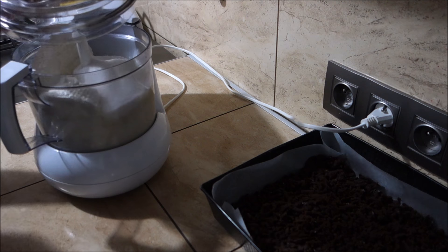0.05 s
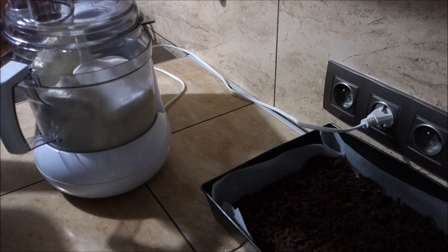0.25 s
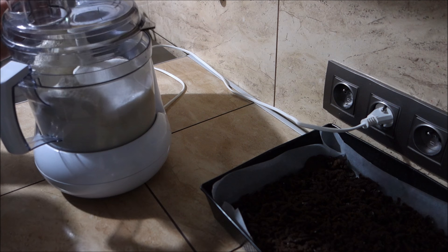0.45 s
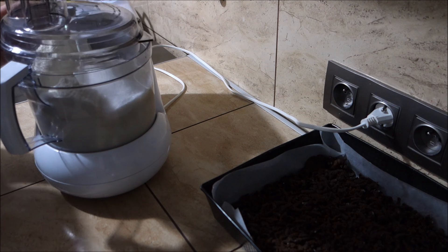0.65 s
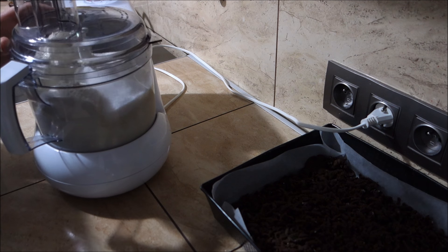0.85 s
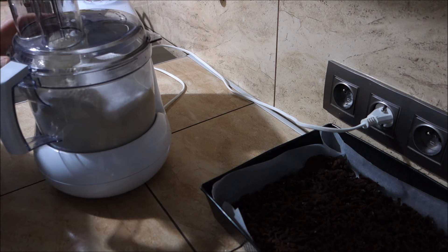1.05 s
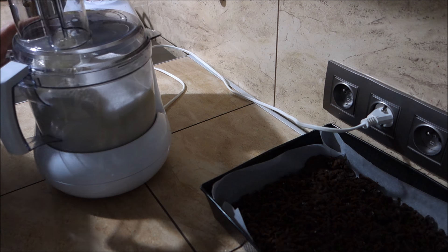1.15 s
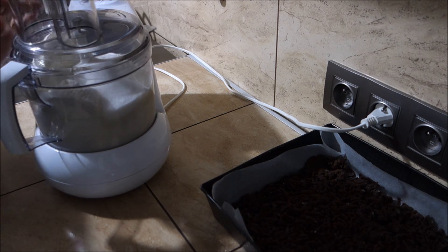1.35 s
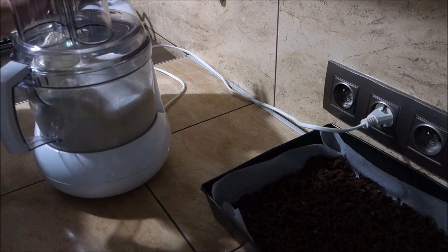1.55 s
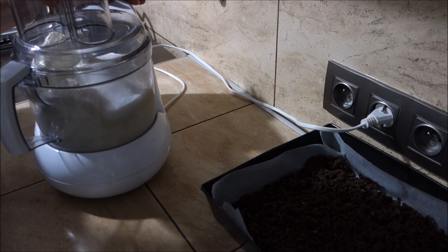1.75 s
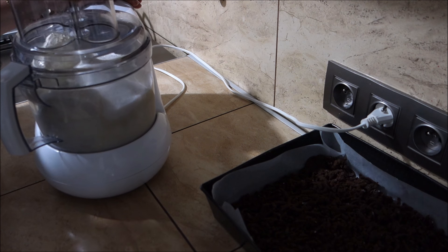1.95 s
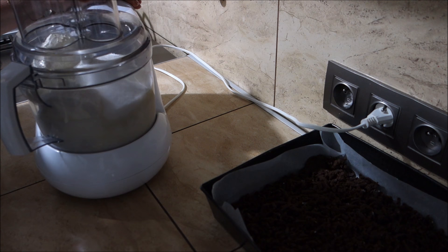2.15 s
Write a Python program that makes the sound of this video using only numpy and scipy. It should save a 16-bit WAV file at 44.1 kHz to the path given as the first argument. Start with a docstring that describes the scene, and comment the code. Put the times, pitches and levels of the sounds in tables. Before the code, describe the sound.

A plastic lid knocks and rattles onto a food processor bowl, slides briefly along the rim, then locks with a loud clatter. The hollow knocks ring a little in a tiled kitchen, heard close over a faint hum.

```python
"""Food processor lid on its bowl

A plastic lid is lowered onto the bowl, knocked about, slid and locked. Each knock is a short rattle
of hard contacts that rings the plastic; the hollow bowl booms and the counter thumps under it.
The tiled kitchen rings for half a second over a faint appliance hum; a small microphone limits peaks."""
import sys
import numpy as np
from scipy import signal
from scipy.fft import rfft, irfft
from scipy.io import wavfile
from scipy.ndimage import uniform_filter1d

SR = 44100
rng = np.random.default_rng(int(sys.argv[2]) if len(sys.argv) > 2 else 0)


def store_wav(level_fs):
    """Save 16-bit WAV to argv[1]."""
    pcm = np.round(np.clip(np.atleast_2d(level_fs), -1, 1) * 32767)
    wavfile.write(sys.argv[1], SR, pcm.T.astype(np.int16))


N = 97108

# air noise spectrum: f/Hz, relative density/dB
AIR_SPECTRUM = [(25, 15.5), (50, 0.5), (100, -53), (160, -15.5), (295, -12), (800, -14.5), (2100, -23.5),
                (5000, -30), (11000, -40.5)]
# appliance hum: f/Hz, level/dB
HUM_PARTIALS = [(49, -49), (97, -63), (295, -59)]
# left-right likeness of the room: f/Hz, correlation
STEREO_CORRELATION = [(60, 0.62), (170, 1), (500, 0.96), (1420, 0.64), (4080, 0.35), (11700, -0.56)]
# room decay: f/Hz, T60/s
ROOM_DECAY = [(60, 0.11), (200, 0.89), (600, 0.52), (2000, 0.56), (5000, 0.53), (11000, 0.38)]
# echo spectrum: f/Hz, relative level/dB
ROOM_SPECTRUM = [(60, -2), (200, -9), (600, 1.5), (2000, 2), (5000, 6.5), (11000, 9.5)]
# lid sliding on the rim: t/s, level/dB
SLIDE_ENVELOPE = [(1.1, -59), (1.2, -34.5), (1.333, -43.5), (1.371, -25.5), (1.428, -27.5), (1.5, -41),
                  (1.561, -60), (1.638, -52), (1.662, -32), (1.72, -66), (1.8, -72)]
# slide spectrum: f/Hz, relative density/dB
SLIDE_SPECTRUM = [(88, -54), (150, -15.5), (227, 0.5), (433, -16), (921, -15.5), (1800, -22), (6650, -31.5),
                  (12000, -40.5)]
# counter thumps: t/s, level/dB
COUNTER_THUMPS = [(.246, -31.5), (0.518, -33), (0.787, -33)]
# bowl booms: t/s, level/dB of the low, middle and upper hollow mode
BOWL_BOOMS = [(0.245, -17, -19.5, -14.5), (0.393, -69, -55, -36.5), (.516, -16, -5.5, -24),
              (0.56, -57, -23, -22), (0.661, -13, -12, -15.5), (0.788, -14.5, -9, -14.5),
              (0.814, -18.5, -3, -21), (0.881, -20, -8.5, -15), (0.93, -14.5, -5.5, -26),
              (0.966, -17, -49, -15), (1.003, -8.5, -17.5, -25), (1.039, -17.5, -17, -34),
              (1.15, -29, -23, -31), (1.236, -27.5, -20, -28), (1.293, -25.5, -41, -44),
              (1.374, -22, -36, -37.5), (1.646, -16, -31, -48), (1.701, -40, -21, -33),
              (1.81, -8, -18.5, -19), (1.854, -47, -19.5, -34), (1.924, -23, -17, -53),
              (1.949, -16.5, -18, -31), (2.003, -12.5, -5.5, -10.5), (2.045, -17, -19, -13),
              (2.101, -16, -22, -31)]
# modes of lid and bowl wall: f/Hz, relative level/dB, T60/s
PLASTIC_MODES = [(499, -2.5, 0.035), (574, -2.5, 0.06), (698.8, -6.5, 0.052), (870, -6, 0.04),
                 (969, -12.5, 0.06), (1241, -21.5, 0.054), (1568, -16, 0.038), (1685, -7.5, 0.024),
                 (2015, -4, 0.013), (2360, 1.5, .02), (2590, 8.5, 0.01), (2975, 11, 0.012),
                 (3390, 13, 0.01), (3834, 4, 0.013), (4560, -19, 0.057), (6890, 13.5, 0.0027)]
# knock bands: lower f/Hz, upper f/Hz
KNOCK_BANDS = [(400, 1500), (1500, 5000), (5000, 16000)]
# ring over crack for a squarely struck mode: level/dB per knock band
RING_OVER_CRACK = [14, 10, 8]
# rim on rim: t/s, level/dB per knock band (3), best-struck f/Hz (3), rattle decay/s
RIM_KNOCKS = [(0.241, -21, -26.5, -44.5, 1070, 1640, 2530, 0.023),
              (.514, -22.5, -28.5, -46, 480, 990, 2190, 0.0046),
              (0.531, -29.5, -27.5, -34.5, 7100, 1640, 3900, 0.003),
              (.661, -25.5, -31, -42, 480, 990, 2120, 0.0047),
              (0.7448, -39, -28, -27, 6660, 2060, 4500, 0.0036),
              (0.753, -28.5, -18, -48, 3000, 3470, 3700, 0.013),
              (.784, -16, -26.5, -33.5, 669, 965, 3880, 0.027),
              (.81, -21.5, -40, -63, 1016, 2060, 3450, 0.04),
              (.886, -23.5, -29, -61, 494, 990, 2040, 0.0065),
              (0.927, -20, -36, -71, 1260, 1620, 2000, 0.0017),
              (.989, -35, -27, -39, 1260, 2900, 4600, 0.0042),
              (0.996, -19, -23, -60, 953, 1260, 1950, 0.034),
              (1.03, -17, -30.5, -82, 882, 950, 2100, 0.027),
              (1.236, -31, -70.5, -51, 520, 905, 1650, 0.011),
              (1.428, -43, -36.5, -35.5, 900, 3000, 6700, 0.0015),
              (1.549, -45, -47, -79, 650, 2380, 3470, 0.0065),
              (1.646, -36.5, -43, -73, 860, 2430, 3470, 0.022),
              (1.678, -38, -40, -80, 910, 2350, 3320, 0.0023),
              (1.699, -36, -39, -79, 910, 1720, 2260, 0.0027),
              (1.807, -28, -35, -47.5, 780, 1080, 1630, 0.049),
              (1.849, -28, -27, -28.5, 970, 1770, 2880, 0.0025),
              (1.99, -22.5, -23, -31, 1050, 2020, 3090, 0.023),
              (2.006, -15.5, -20.5, -35.5, 1060, 1610, 2080, 0.031),
              (2.044, -22.5, -28, -40.5, 1030, 1670, 2020, 0.066),
              (2.1, -28, -29, -50, 970, 1210, 1720, 0.0021)]

AIR_DB, ROOM_DB, ROOM_BUILD_S = -47, 1.5, 0.00043
SLIPS_PER_S, CONTACTS_PER_S, CONTACT_SPREAD_DB = 2500, 5900, 1
THUMP_HZ, THUMP_SWING_S = 108, 0.04
HOLLOW_HZ, HOLLOW_SWING_S = (196, 272, 343), 0.022
SWING_RISE_S, SWING_DETUNE = 0.0064, 0.01
HELD_DB, HELD_T60_S, HELD_PHASE_STEP_RAD = -12, 0.5, 0.07
RATTLE_RISE_S, FIRST_BLOW_RATIO = 0.0014, 0.2
MODE_SPREAD_DB, OFF_SPOT_DB_PER_OCT = 2.5, 55
PORTS_BAND_HZ, PORTS_DB = (5870, 10000), -3.5
LIMIT_DB, ATTACK_S, RELEASE_DB_PER_S = -4, 0.0007, 261
BASS_CUT_HZ, STOPBAND_HZ = 110, 12000


def amp(db):
    return 10 ** (np.asarray(db) / 20)


def unit_rms(x):
    return x / np.sqrt(np.mean(x ** 2) + 1e-20)


def at_hz(points, hz):
    freqs_hz, values = np.transpose(points)
    return np.interp(np.log(hz), np.log(freqs_hz), values)


def bandpass(x, low_hz, high_hz):
    sos = signal.butter(2, [low_hz, high_hz], "band", fs=SR, output="sos")
    return signal.sosfilt(sos, x + 1e-18)


def resonator(x, hz, t60_s):
    """One mode: a click rings as a decaying cosine."""
    r, w = amp(-60 / (max(t60_s, 0.003) * SR)), 2 * np.pi * hz / SR
    return signal.lfilter([0.5, 0, -0.5], [1, -2 * r * np.cos(w), r * r], x + 1e-18) / np.sin(w)


def stereo_noise(gain_at, size):
    """Diffuse noise in half-octave bands, each with its own correlation and gain_at(hz)."""
    out, edges_hz = 0, 22 * 2 ** np.arange(0, 9.6, 0.5)
    white = rng.standard_normal((2, 2, size))
    for k, (low_hz, high_hz) in enumerate(zip(edges_hz, edges_hz[1:])):
        mid, side = bandpass(white[k % 2], low_hz, high_hz)
        hz = np.sqrt(low_hz * high_hz)
        corr = np.clip(at_hz(STEREO_CORRELATION, hz), -0.9, 0.99)
        out += gain_at(hz) * (np.sqrt(1 + corr) * mid + np.sqrt(1 - corr) * side * [[1], [-1]])
    return out


def contacts(rate_per_s, size):
    """Tiny hard touches, random in time and size."""
    sizes = amp(CONTACT_SPREAD_DB * np.minimum(rng.exponential(1, size), 4))
    signs = rng.choice([-1, 1], size)
    return unit_rms(sizes * signs * (rng.random(size) < rate_per_s / SR))


def room_tone():
    """Soft air noise plus appliance hum."""
    t = np.arange(N) / SR
    hum = sum(np.sqrt(2) * amp(db) * np.sin(2 * np.pi * (hz * t + rng.random()))
              for hz, db in HUM_PARTIALS)
    air = stereo_noise(lambda hz: amp(at_hz(AIR_SPECTRUM, hz)), N)
    return amp(AIR_DB) * unit_rms(air) + hum


def kitchen_echoes(x):
    """Dense reflections off the tiles: fast build-up, decay band by band."""
    t = np.arange(SR) / SR
    tail = stereo_noise(lambda hz: amp(at_hz(ROOM_SPECTRUM, hz) - 60 * t / at_hz(ROOM_DECAY, hz)), SR)
    tail *= 1 - np.exp(-t / ROOM_BUILD_S)
    return amp(ROOM_DB) * signal.fftconvolve(x[None], unit_rms(tail) / np.sqrt(SR), axes=1)[:, :N]


def lid_slide():
    """Dense slips of plastic on plastic, coloured by the lid."""
    colour = amp(at_hz(SLIDE_SPECTRUM, np.linspace(1, SR / 2, N // 2 + 1)))
    slips = irfft(rfft(contacts(SLIPS_PER_S, N)) * colour, N)
    level_db = np.interp(np.arange(N) / SR, *np.transpose(SLIDE_ENVELOPE))
    return amp(level_db) * unit_rms(slips)


def low_swing(start_s, hz, swing_s):
    """A low mode swells for a few cycles and dies; the room holds it at a wavering pitch."""
    out, t = np.zeros(N + SR), np.arange(SR // 2) / SR
    phase = 2 * np.pi * hz * (1 + SWING_DETUNE * rng.normal()) * t
    direct = np.exp(-(t / swing_s) ** 2) * np.sin(phase)
    wander = np.cumsum(rng.normal(0, HELD_PHASE_STEP_RAD, len(t)))
    held = amp(HELD_DB - 60 * t / HELD_T60_S) * np.sin(phase + wander)
    rise = (1 - np.exp(-t / SWING_RISE_S)) ** 2
    out[int(start_s * SR):][:len(t)] = rise * (direct + held)
    return out[:N]


def counter_thumps():
    """The counter swings under the bowl."""
    return sum(amp(db) * low_swing(start_s, THUMP_HZ, THUMP_SWING_S) for start_s, db in COUNTER_THUMPS)


def bowl_booms():
    """Three hollow modes, slightly detuned each time by the grip on the bowl."""
    return sum(amp(db) * low_swing(start_s, hz, HOLLOW_SWING_S)
               for start_s, *levels_db in BOWL_BOOMS for hz, db in zip(HOLLOW_HZ, levels_db))


def rim_rattle(decay_s, size):
    """A first blow, then dying contacts; together they excite all frequencies evenly."""
    t = np.arange(size) / SR
    rattle = contacts(CONTACTS_PER_S, size) * np.exp(-t / decay_s) * (1 - np.exp(-t / RATTLE_RISE_S))
    rattle[0] = FIRST_BLOW_RATIO * np.sqrt(np.sum(rattle ** 2))
    spectrum = rfft(rattle)
    smooth_power = uniform_filter1d(np.abs(spectrum) ** 2, size=40)
    return irfft(spectrum / np.sqrt(smooth_power), size) * (t < 0.2)


def plastic_ring(rattle, low_hz, high_hz, struck_hz, scatter_db):
    """The modes in one band; those nearest the best-struck frequencies ring most."""
    rings, nearest_oct = 0, 1
    for (hz, mode_db, t60_s), extra_db in zip(PLASTIC_MODES, scatter_db):
        if low_hz <= hz < high_hz:
            off_oct = min(*np.abs(np.log2(hz / np.array(struck_hz))), 0.5)
            nearest_oct = min(nearest_oct, off_oct)
            gain = amp(mode_db + extra_db - OFF_SPOT_DB_PER_OCT * off_oct)
            rings += gain * resonator(rattle, hz, t60_s)
    return amp(-OFF_SPOT_DB_PER_OCT * nearest_oct) * unit_rms(rings)


def lid_knocks():
    """Rim strikes rim: each rattle sounds as a broad crack plus ringing plastic."""
    out, size = np.zeros(N + SR), SR // 4
    for start_s, low_db, mid_db, top_db, *struck_hz, decay_s in RIM_KNOCKS:
        rattle = rim_rattle(decay_s, size)
        scatter_db = MODE_SPREAD_DB * rng.normal(size=len(PLASTIC_MODES))
        bands = zip(KNOCK_BANDS, (low_db, mid_db, top_db), RING_OVER_CRACK, (1, -1, 1))
        for band_hz, db, ring_db, sign in bands:
            crack = unit_rms(bandpass(rattle, *band_hz))
            knock = crack + amp(ring_db) * plastic_ring(rattle, *band_hz, struck_hz, scatter_db)
            onset_rms = np.sqrt(np.mean(knock[:SR // 50] ** 2))  # first 20 ms
            out[int(start_s * SR):][:size] += sign * amp(db) * knock / onset_rms
    return out[:N]


def scene():
    """Lid and bowl in the kitchen; the two microphone ports hear the treble differently."""
    direct = lid_knocks() + bowl_booms() + counter_thumps() + lid_slide()
    port_side = amp(PORTS_DB) * bandpass(direct, *PORTS_BAND_HZ) * [[1], [-1]]
    return direct + port_side + kitchen_echoes(direct) + room_tone()


def record(dry):
    """Look-ahead peak limiter, then bass and top cut."""
    ahead = int(2 * ATTACK_S * SR)
    over_db = np.maximum(20 * np.log10(np.abs(dry).max(axis=0) + 1e-9) - LIMIT_DB, 0)
    early_db = np.append(over_db[ahead:], np.zeros(ahead))
    release_db = RELEASE_DB_PER_S * np.arange(N) / SR
    held_db = np.maximum.accumulate(early_db + release_db) - release_db
    pole = np.exp(-1 / (ATTACK_S * SR))
    out = dry * amp(-signal.lfilter([1 - pole], [1, -pole], held_db))
    out = signal.sosfilt(signal.butter(2, BASS_CUT_HZ, "high", fs=SR, output="sos"), out)
    return signal.sosfilt(signal.cheby2(14, 70, STOPBAND_HZ, fs=SR, output="sos"), out)


dry = scene()
out = record(dry)
store_wav(out)
```